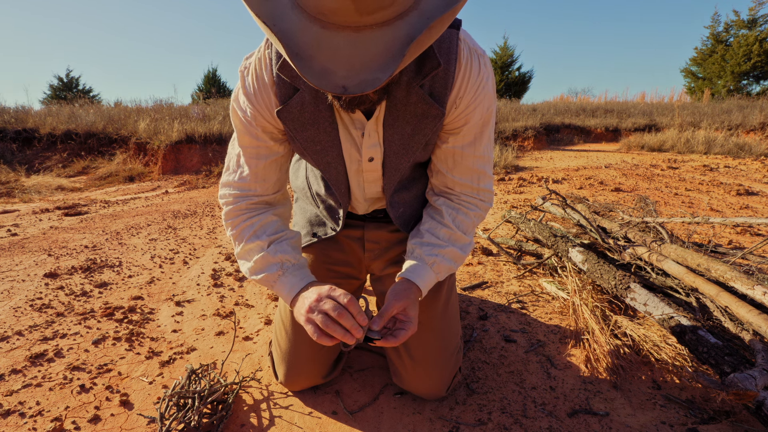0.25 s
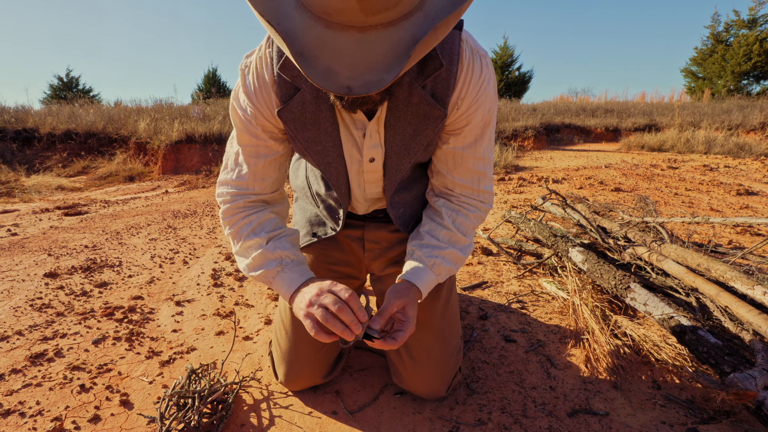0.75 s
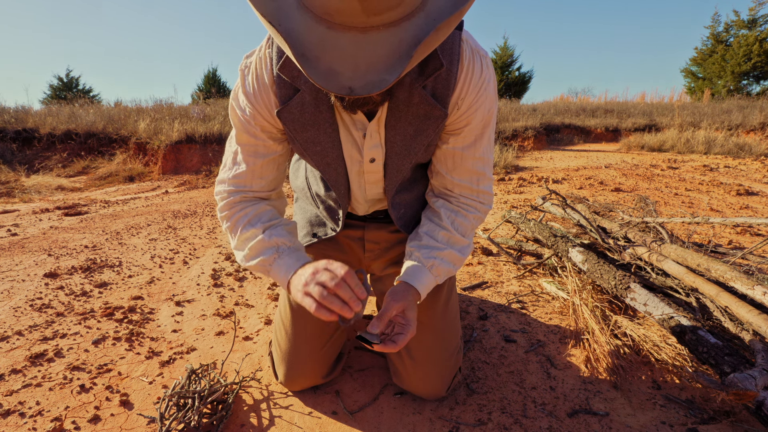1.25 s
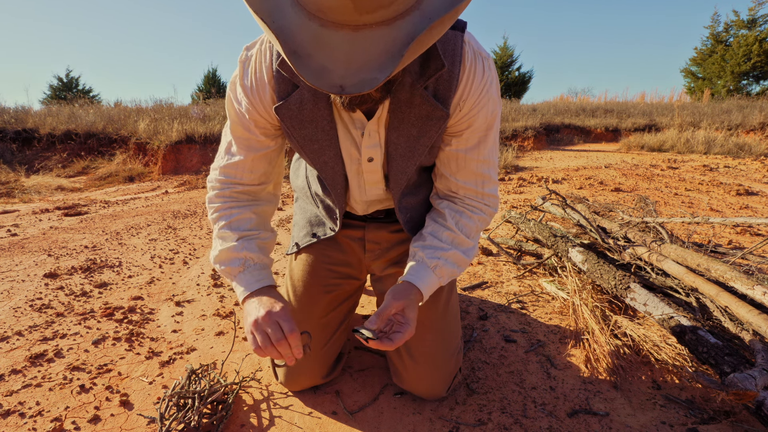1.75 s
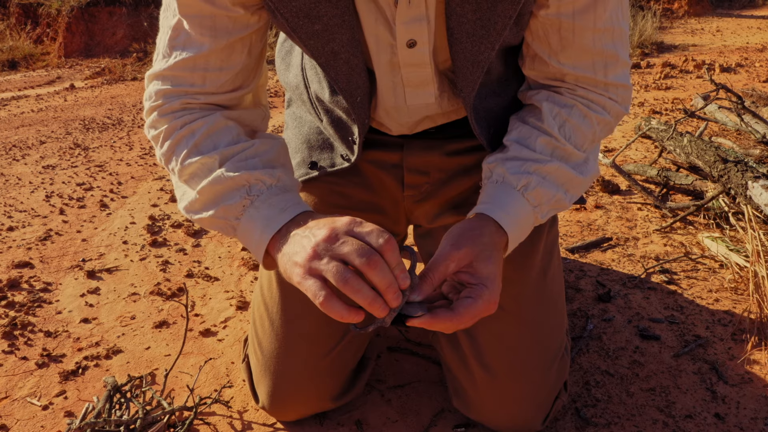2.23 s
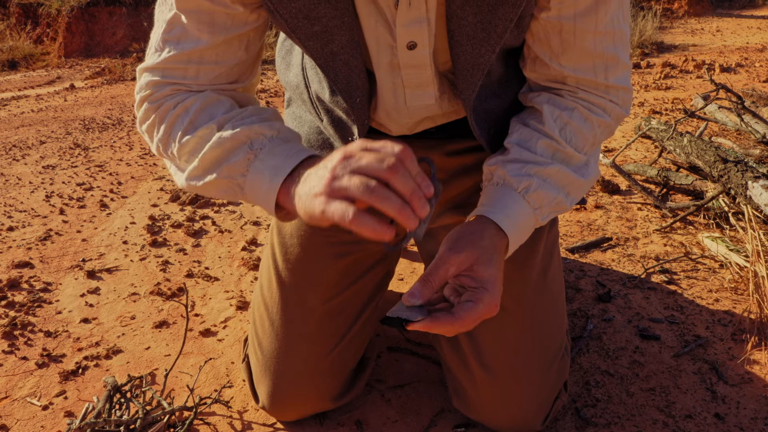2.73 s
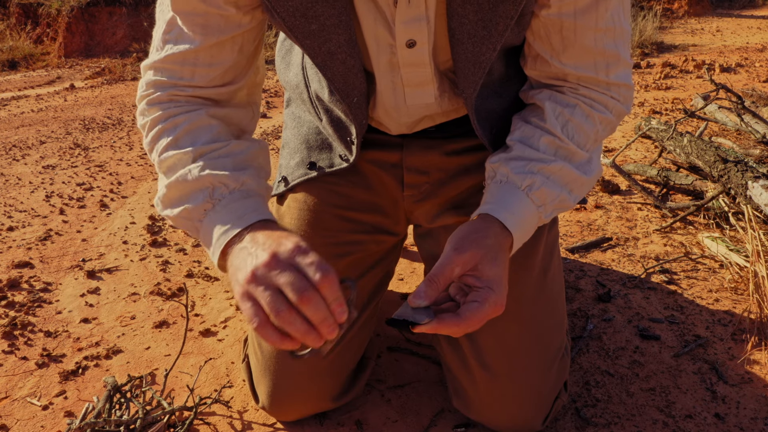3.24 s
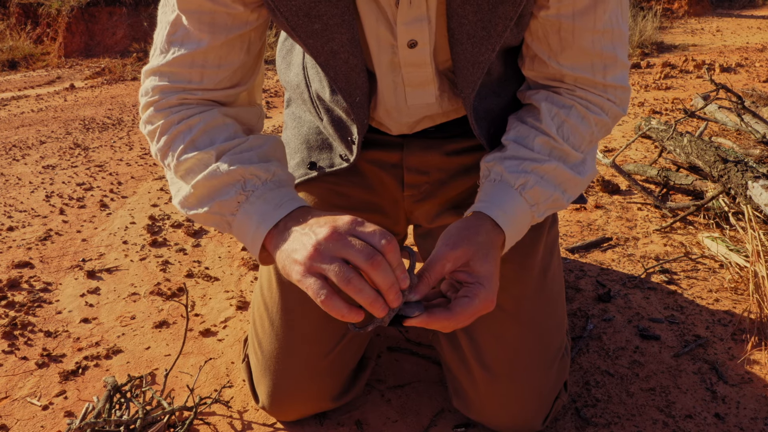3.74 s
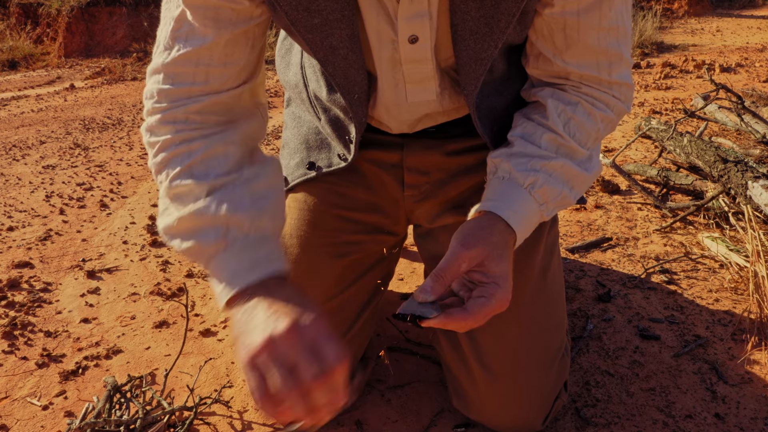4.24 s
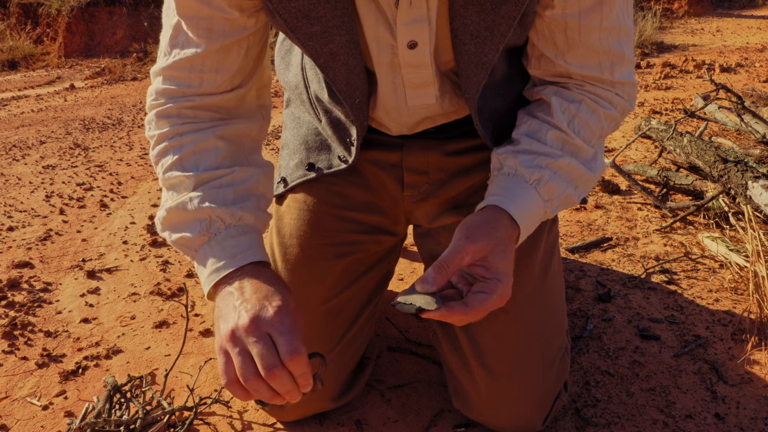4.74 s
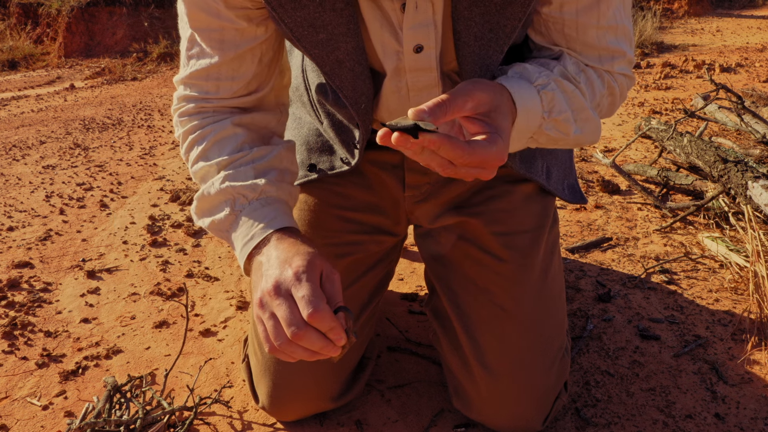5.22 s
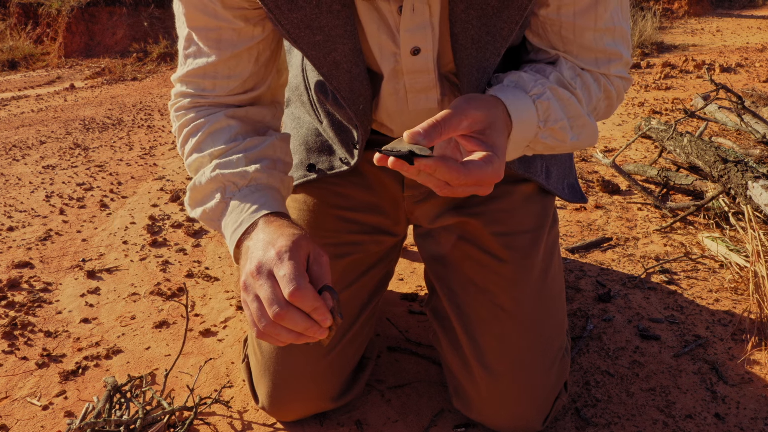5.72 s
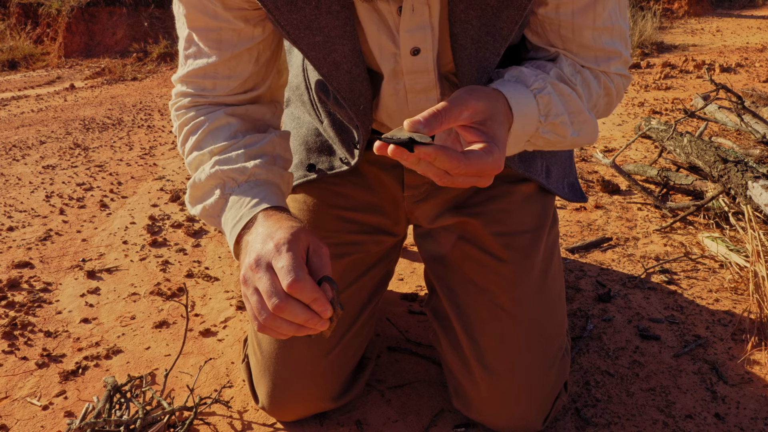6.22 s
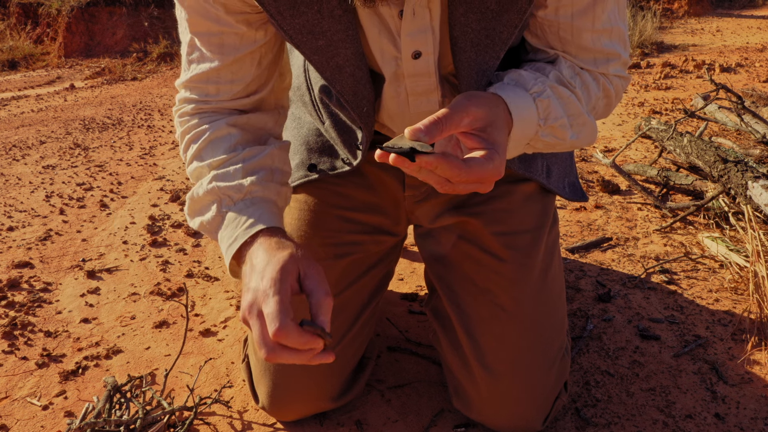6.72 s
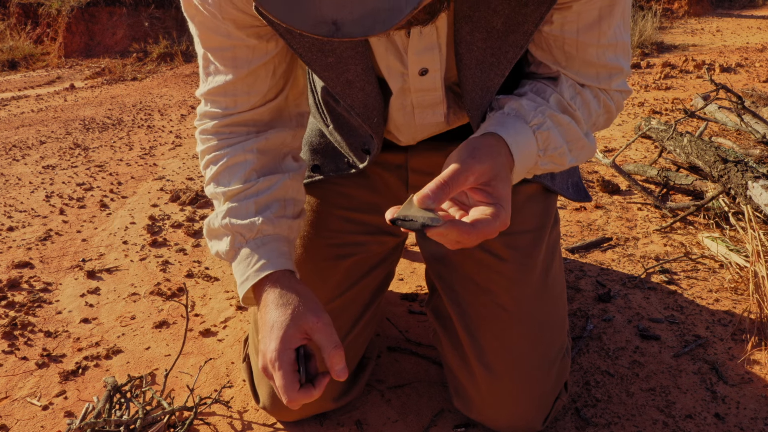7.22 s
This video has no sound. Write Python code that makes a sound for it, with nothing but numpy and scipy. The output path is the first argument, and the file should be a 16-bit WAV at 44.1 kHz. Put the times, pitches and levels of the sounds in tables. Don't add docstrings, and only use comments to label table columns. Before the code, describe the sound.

Dry open ground, heard in stereo with the hands close and central. Shrill cicadas buzz steadily on both sides, joined by raspy katydids whose bouts swell and stop abruptly, and by rapid pulsing cricket chirps, the nearer one toward the left. From 0 to 2 s low gusts thump the microphone, then the air falls nearly still. A faint tap comes near 1 s; at 1.5 s steel hits flint with a hard bright tick and a very short gritty scrape. A clear light tap follows at 2.25 s, a second blow with a stronger edge catch at 2.8 s, a softer tap at 3.56 s, and the last quick blow at 4.25 s, with a slight puff of arm-moved air. A distant engine drones softly at right, its hum changing. Insects dominate until faint cloth rustle grows from 6.3 s, ending with small dull thumps and gritty crunches around 7.35-7.43 s.

```python
import sys
import numpy as np
from scipy import signal
from scipy.fft import rfft, irfft, next_fast_len
from scipy.io import wavfile
from scipy.ndimage import uniform_filter1d

SR = 44100
rng = np.random.default_rng(int(sys.argv[2]) if len(sys.argv) > 2 else 0)


def ratio(d):
    e = np.asarray(d, float) / 20
    return 10 ** e


def persist_wave(psi):
    counts = np.round(np.clip(psi, -1, 1) * 32767).astype(np.int16)
    wavfile.write(sys.argv[1], SR, np.atleast_2d(counts).T)


N = 329427
TIME = np.arange(N) / SR
COARSE = np.arange(0, N + 40, 40) / SR


def curve(table, column=1):
    table = np.array(table)
    return np.interp(TIME, table[:, 0], table[:, column])


def unit(x):
    return x / np.sqrt(np.mean(x ** 2))


def colour(x, points):
    hz, db = np.transpose(points)
    size = next_fast_len(N, True)
    bins = np.maximum(np.fft.rfftfreq(size, 1 / SR), 1)
    gain = ratio(np.interp(np.log(bins), np.log(hz), db, right=-80))
    return unit(irfft(rfft(np.float32(x), size) * np.float32(gain), size)[..., :N])


def thin(x, hz):
    return signal.sosfilt(signal.butter(2, hz, "high", fs=SR, output="sos"), x)


def ring(push, hz, t60):
    pole = np.exp(2j * np.pi * hz / SR - np.log(1000) / (t60 * SR))
    return signal.lfilter([1], [1, -pole], push).imag


def modes(push, table, which):
    return sum(ratio(db[which]) * ring(push, hz, t60) for hz, t60, *db in table)


def walk(rate, count=N):
    k = int(SR / rate)
    steps = np.repeat(rng.standard_normal(count // k + 1), k)
    return unit(uniform_filter1d(uniform_filter1d(steps, k), k)[:count])


def grains(scatter_db, shape=(N,)):
    return unit(rng.standard_normal(shape) * ratio(scatter_db * rng.exponential(size=shape)))


def sides(left_db, right_db):
    return ratio(np.array([[left_db], [right_db]]))


def swells(table):
    gain = sum(ratio(db) * np.exp(-((COARSE - s) / width) ** 2) for s, db, width in table)
    return np.interp(TIME, COARSE, gain)


def bouts(table):
    power = 0
    for start, stop, db, swell in table:
        rise = (1 - np.exp(-np.maximum(COARSE - start, 0) / swell)) ** 4
        power = power + ratio(2 * db) * rise * (COARSE < stop)
    return np.interp(TIME, COARSE, uniform_filter1d(np.sqrt(power), size=20))


# (frequency [Hz], level [dB])
AIR_COLOUR = [(20, -10.5), (60, 0), (150, -7.5), (250, -14.5), (500, -25.5), (1200, -39), (2600, -28),
              (4000, -28.5), (5500, -20.5), (7000, -28), (11000, -27), (16000, -26)]


def air():
    mid, side = (colour(rng.standard_normal(N), AIR_COLOUR) for _ in range(2))
    return ratio(-49 + 0.48 * walk(1.9)) * (mid + 0.86 * side * np.array([[1], [-1]]))


# (time [s], pitch [Hz], level [dB])
DRONE = [(0, 61.63, -49), (2, 61.58, -47.5), (3.4, 60.83, -47), (4.2, 61, -54), (5, 61.2, -60.5)]
# (multiple, level [dB])
DRONE_ORDERS = [(1, 2.5), (2, -3.5), (3, -20), (4, -18.5)]
# (time [s], pitch [Hz], level [dB])
WHINE = [(3, 147.2, -67), (3.6, 146.9, -53.5), (4, 146, -68), (4.7, 145, -57), (5.8, 145.5, -49),
         (6.8, 145.1, -54), (7.2, 142, -72)]
# (time [s], pitch [Hz], level [dB])
HUM = [(5.5, 123, -59), (6.2, 121.3, -57), (7.1, 116.6, -52.5), (7.47, 116.2, -55)]


def engine():
    out = 0
    whine_orders = [(.5, -4.0), (1, 0.0), (1.5, -11.5)]
    for table, orders in ((DRONE, DRONE_ORDERS), (WHINE, whine_orders), (HUM, [(0.97, 0)])):
        running = 1. * (TIME > table[0][0]) * (TIME < table[-1][0])
        running = uniform_filter1d(running, size=15000)
        phase = np.cumsum(curve(table) * (1 + 0.0043 * walk(5))) * 2 * np.pi / SR
        for multiple, db in orders:
            level = ratio(curve(table, column=2) + db + 1.1 * walk(3.22))
            out = out + running * level * np.sin(multiple * phase) * np.sqrt(2)
    return out * sides(-14.0, 3.4)


# (peak [s], level [dB], width [s])
GUSTS = [(.07, -39, 0.022), (.17, -44, 0.06), (.29, -46.5, 0.064), (.62, -45, 0.066), (.43, -33, 0.054),
         (.51, -45, 0.037), (.75, -37, 0.052), (.92, -43, 0.17), (1.11, -38, 0.12), (1.35, -49, 0.15),
         (1.5, -43, 0.1), (1.62, -40.5, 0.068), (1.8, -34, 0.059), (1.95, -38.5, 0.09), (1.1, -52, 0.87)]
# (frequency [Hz], density [dB per Hz])
GUST_COLOUR = [(12, -17), (20, -1), (33, -11), (65, -6), (136, -12.5), (783, -43), (990, -46.5),
               (1500, -63), (1950, -67), (3300, -120)]
# (peak [s], level [dB], width [s])
HEAVES = [(.2, -52, 0.21), (.46, -48, 0.048), (1.1, -36, 0.25), (1.6, -48, 0.44), (2.29, -39.5, 0.13),
          (3.05, -41, 0.11), (3.45, -52.5, 0.22), (4.31, -47, 0.033), (4.85, -41, 0.2), (6.4, -65, 0.29)]
# (peak [s], level [dB], width [s])
ARM_SWING = [
    (4.5, -43, 0.048),
]


def wind():
    both, left, right = (colour(grains(3.15), GUST_COLOUR) for _ in range(3))
    calm_s = 2.01
    blowing = swells(GUSTS) * ratio(1.8 * walk(19.8)) * (TIME < calm_s)
    eddies = (blowing + swells(ARM_SWING)) * (both + .5 * np.array([left, right]))
    heave_colour = [(1, -16.0), (5, 4.5), (12, -9.5), (22, -17.0), (50, -20.5), (100, -50)]
    heave = colour(rng.standard_normal(N), heave_colour)
    return eddies + (swells(HEAVES) + ratio(-55.5)) * heave * sides(-34, 12.75)


def singer(clicks, body, throb_hz, depth, sharp, alike):
    phase = np.cumsum(throb_hz * (1 + 0.0207 * walk(1.976))) * 2 * np.pi / SR
    throb = 1 - depth + depth * np.exp(sharp * (np.cos(phase) - 1))
    both, *own = np.roll(clicks, rng.integers(N), axis=1)
    return colour(throb * (alike * both + np.array(own)), body) * np.exp(0.11 * walk(5.5))


# (time [s], cicadas [dB], broad singer on the right [dB])
SWELLING = [(0, -39.5, -56), (.8, -40, -50.5), (1.5, -38.5, -52.5), (2.4, -40.5, -48), (5.3, -39.5, -46),
            (5.84, -39.5, -46), (6.2, -40, -47), (7.47, -41, -46.5)]
# (frequency [Hz], density [dB per Hz])
CICADA_LEFT = [(6000, -32), (7000, -23), (7600, -6), (8000, -0.5), (8600, 0), (9100, -9.5), (9900, -18),
               (10400, -13), (12000, -41)]
CICADA_RIGHT = [(6000, -31), (7300, -16.5), (8050, -2), (8250, 2), (8450, 4.5), (8800, -10.5),
                (9300, -14.5), (9700, -18), (10300, -30), (12000, -21)]
BROAD = [(3000, -33.5), (3800, -8.5), (5000, -6), (6000, -1.5), (6900, 2), (7500, -2), (9000, -8),
         (11000, -27)]
BROAD_LOW = [(2500, -31), (2750, -2), (3300, -4.5), (3800, 1.5), (4400, -14.5), (5000, -30)]
TICKER = [(9000, -33), (9450, -3), (9750, 0), (10100, -25)]
RASP = [(8500, -41), (9500, -0.5), (10300, -3), (10800, -2), (10970, 6), (11150, -2), (11500, 0),
        (12100, -7), (13000, -2), (14000, -7), (14800, -4)]
KATYDID = [(11000, -25), (12900, -7), (13600, -8), (14400, -2), (15000, 2.5), (15700, -4), (17000, -8)]
SHRILL = [(11000, -17.5), (12500, -2.5), (13200, -7), (14000, -0.5), (15500, -0.5), (17000, -12)]
REED = [(4100, -41), (4450, -3), (5000, -4), (5250, 3), (5700, -17), (5870, 8.5), (6060, -10), (6350, 1),
        (6600, -30)]
FAR_CRICKETS = [(3900, -29), (4250, 3.5), (4500, -2.5), (4750, -18), (4950, -22), (5300, -35)]
# (start [s], stop [s], level [dB], swell [s])
RASP_SONG = [(-.1, .685, -48, .02), (-.1, 1.025, -48.5, .02), (-.1, 1.78, -53, .02), (1.9, 3.7, -46, .35),
             (3.5, 4.4, -54, .05), (4.1, 5.415, -45.5, .12), (5.2, 7.6, -52, .3)]
KATYDID_SONG = [(-.1, .415, -48.5, .02), (4.25, 5.415, -44.5, .12), (2.5, 7.6, -60, 1.5)]
SHRILL_SONG = [(-.5, 3.405, -50.5, .5), (3.2, 4.4, -55, .1), (4.5, 7.6, -49.5, .45)]
# (time [s], level [dB])
REED_SONG = [(0, -53), (1.4, -52.5), (2.3, -62.5), (2.8, -70), (7.47, -65)]


def insects():
    cicadas, broad = (ratio(curve(SWELLING, column=k)) for k in (1, 2))
    stutter = swells((3.653 + k * .0575, -48, .005) for k in range(6))
    clicks = grains(1.5, (3, N))
    return (cicadas * sides(2.65, -1.6) * singer(clicks, CICADA_LEFT, 30, 0.43, 1.5, 0.45)
            + cicadas * sides(-3.0, 4.6) * singer(clicks, CICADA_RIGHT, 33.3, 0.4, 0.87, 0.69)
            + broad * sides(-11, 10.02) * singer(clicks, BROAD, 11.5, 0.25, 2.1, 0.1)
            + broad * sides(-31, -4.5) * singer(clicks, BROAD_LOW, 11.5, 0.43, 1.3, 0.35)
            + sides(-55.0, -53) * singer(clicks, TICKER, 9.7, 0.95, 2.1, 0.32)
            + bouts(RASP_SONG) * sides(2.6, 4.8) * singer(clicks, RASP, 118, 0.43, 1.5, 0.18)
            + bouts(KATYDID_SONG) * sides(4.4, -6) * singer(clicks, KATYDID, 64, 0.96, 1.6, 0.33)
            + stutter * sides(0, -11) * colour(clicks[1:], RASP[3:-1] + KATYDID[3:])
            + bouts(SHRILL_SONG) * sides(4.4, 4.3) * singer(clicks, SHRILL, 100, .3, 1.5, 0.62)
            + ratio(curve(REED_SONG)) * sides(-26, 7.7) * singer(clicks, REED, 50, 0.3, 1.5, 0.42)
            + sides(-60.0, -53.5) * singer(clicks, FAR_CRICKETS, 22, 0.5, 1.8, 0.33))


def strokes(chirps, gap_s, top_hz, hook, count):
    song = []
    for s, db, climb_hz, swell_db in chirps:
        for k in range(count):
            back = max(k - 1, 0)
            level_db = db - swell_db * back ** 2.3
            song.append((s - k * gap_s, level_db, top_hz - climb_hz * back ** 0.82, hook))
    return song


# (last stroke [s], level [dB], pitch climb [Hz], swell [dB])
CHIRPS = [(.291, -40.5, 130, -0.5), (.585, -41, 130, 2), (.977, -40.5, 120, 1.5), (1.336, -41, 45, 2),
          (1.708, -41, 100, 2.5), (2.095, -41.5, 70, 2.5), (2.418, -42, 99, 2), (2.785, -42, 130, 3),
          (3.169, -42.5, 75, 3), (3.545, -41.5, 100, 3), (3.903, -39.5, 115, 2.5), (4.232, -38, 85, 3),
          (4.6, -39.5, 105, 3.5), (4.873, -43, 142, 5), (5.277, -44.5, 133, 5), (5.639, -42, 19.7, 11),
          (6.01, -43, 62, 2), (6.41, -41.5, 140, 3), (6.781, -43.5, 110, 6), (7.111, -42, 110, 7),
          (7.4, -44, 150, 5)]
# (last stroke [s], level [dB])
ANSWERS = [(.565, -46), (.76, -56), (1.386, -45.5), (1.746, -45), (1.915, -53), (2.183, -46), (2.526, -48),
           (2.85, -47), (3.175, -45), (3.428, -48), (3.695, -47.5), (4.015, -49), (4.29, -47), (4.68, -48),
           (5.0, -48), (5.47, -54), (5.741, -46), (6.201, -47), (6.675, -44.5), (7.14, -45.5), (7.45, -48)]


def crickets():
    out, u = np.zeros((2, N)), np.linspace(0, 1, num=1300)
    shape = np.sin(np.pi * u ** 1.02) ** 0.93
    answers = [(s, db, 30, 4) for s, db in ANSWERS]
    song = strokes(CHIRPS, gap_s=.046, top_hz=4733, hook=0.12, count=5)
    song += strokes(answers, gap_s=.046, top_hz=4510, hook=.03, count=3)
    for (s, db, hz, hook), lag in zip(song, rng.uniform(0, 2 * np.pi, (len(song), 1))):
        bend = 1.005 - hook * u ** 4 - .03 * (1 - u) ** 4 + .003 * walk(300, count=len(u))
        phase = np.cumsum(hz * bend) * 2 * np.pi / SR + lag
        stroke = ratio(db) * shape * np.sin(phase + np.array([[0], [.9]])) * sides(5.2, -4.0)
        part = out[:, int((s - .009) * SR):][:, :len(u)]
        part += stroke[:, :part.shape[1]]
    scrub = rng.standard_normal((2, 2000)) * np.exp(-np.arange(2000) / 700)
    return out + ratio(-35) * signal.oaconvolve(out, scrub, axes=1)[:, :N]


# (time [s], level [dB])
SLEEVE = [(6.3, -64), (6.6, -57), (6.9, -53.5), (7.2, -54), (7.33, -55.5), (7.37, -59), (7.4, -51),
          (7.44, -53), (7.47, -53)]
# (frequency [Hz], density [dB per Hz])
SLEEVE_COLOUR = [(180, -19), (300, -1), (622, -8.5), (892, -4), (1170, -8), (1540, -6.5), (3500, -17.5),
                 (4550, -35), (7700, -120)]
# (time [s], push length [s], thump [Hz], level [dB])
THUMPS = [(7.344, .0004, 430, -41), (7.353, .0004, 520, -40), (7.3845, .0005, 450, -36),
          (7.389, 0.00032, 383, -32), (7.398, 0.00021, 597, -32.5), (7.394, .0003, 760, -44),
          (7.402, .0005, 320, -40.5), (7.407, .0004, 520, -40), (7.432, .0003, 905, -41)]
# (peak [s], width [s], low ring [dB], high ring [dB])
GRIT = [(7.35, .004, -50, -54), (7.358, .005, -60, -46), (7.391, 0.0056, -46, -38), (7.399, .003, -42, -39),
        (7.405, 0.0034, -38, -44), (7.432, .015, -66, -60)]


def body():
    out = ratio(curve(SLEEVE) + .8 * walk(15)) * colour(grains(1.8), SLEEVE_COLOUR)
    end = slice(int(7.2 * SR), N)
    t = TIME[end]
    knocks = grains(2.3, t.shape)
    low = ring(knocks, 2900, 0.0049) + 0.49 * ring(knocks, 2800, 0.0033) + 0.41 * ring(knocks, 1900, 0.002)
    high = ring(knocks, 3830, 0.0074) + .6 * ring(knocks, 3300, .004) + .5 * ring(knocks, 4600, .006)
    low, high = unit(thin(low, 1400)), unit(thin(high, 2100))
    for s, length, hz, db in THUMPS:
        thump = thin(ring(np.exp(-((t - s) / length) ** 2), hz, 0.031), 220)
        out[end] += ratio(db) * thump / np.abs(thump).max()
    for s, width, low_db, high_db in GRIT:
        out[end] += np.exp(-((t - s) / width) ** 2) * (ratio(low_db) * low + ratio(high_db) * high)
    return out


# (time [s], level [dB], stone ring [Hz], knuckle knock [dB], steel ring [dB])
TAPS = [(.9665, -35.5, 2600, -20, -29), (.967, -35, 1440, -25, -30), (.9675, -31, 3430, -20, -30),
        (.9705, -34, 3450, -20, -30), (1.0, -29, 700, -13, -30), (2.251, -32, 4000, -3, -30),
        (2.2545, -36, 3400, -20, -30), (2.2562, -17, 5030, -28, -9), (2.2577, -9.5, 4100, -23, -12.5),
        (2.26, -21, 4270, -14, -18), (2.2608, -20, 3350, -27, -30), (3.5591, -23, 3000, -13, -30),
        (3.56, -32, 5100, -20, -30), (3.5604, -21.5, 3630, -10, -30), (3.5605, -21, 4270, -14, -30),
        (3.5619, -31, 2300, -5, -30), (3.563, -28, 3300, -7, -30), (3.5644, -28, 3300, -3, -30),
        (4.301, -50, 2300, 10, -30), (4.3012, -33, 900, -20, -30), (.5, -31, 700, -25, -30),
        (5.13, -41, 1280, -5, -33), (1.65, -46, 2330, -2, -30)]


def tap(tick, db, hz, knock_db, steel_db):
    t60 = min(0.0056 * ratio(-.35 * (db + 13)), .012)
    knock = ring(tick, 2340, 0.005) + 0.28 * ring(tick, 1900, 0.02)
    knock += 0.22 * ring(tick, 1480, .016) + 0.3 * ring(tick, 800, 0.011)
    stone = ring(tick, hz, t60) + ratio(-15) * ring(tick, 3400, .024) + ratio(knock_db) * knock
    steel = ratio(steel_db) * (ring(tick, 7100, 0.023) + .5 * ring(tick, 11580, 0.02))
    soft_stone = uniform_filter1d(np.roll(stone, 2), size=3)
    return ratio(db) * thin(soft_stone + steel, 1330)


# (time [s], tick [dB], drag [dB], edge catch after [s], catch [dB])
BLOWS = [
    (1.5267, 0, -18.5, 0.013, -21),
    (2.8175, 1, -18, 0.012, -14),
    (4.2506, 1, -17, 0.0096, -21),
]
# (frequency [Hz], t60 [s], level in blow 1, 2, 3 [dB])
STEEL = [(7220, 0.018, -21, -17, -16), (7490, 0.014, -15, -7.5, -6.5), (7960, 0.016, -2, 1, 1.5),
         (8740, 0.037, -14, -12.5, -10), (9480, 0.0077, -5.5, -4.5, -9), (10330, 0.0061, -10, -6, -11),
         (11380, 0.014, -8, -7, -9), (11960, 0.02, -15, -11, -14), (13700, 0.0049, -7, -20, -20),
         (14800, 0.0059, -9, -9, -21)]
STONE = [(1800, 0.014, -23, -42, -33), (2010, 0.014, -34, -25, -38), (2380, 0.014, -35, -26, -15),
         (2570, .009, -20, -8.5, -12), (3220, 0.011, -7, -28, -22), (3640, 0.013, -6, -6.5, -13),
         (4120, 0.014, -18, -14, -11), (4340, 0.011, -9, -7.5, -9.5), (4550, .012, -5.5, -26, -15),
         (4950, 0.011, -15, -20, -9.5), (5100, 0.01, -22, -8, -18), (5260, 0.011, -9.5, -21, -18),
         (5780, 0.011, -13, -8, -11.5), (6460, 0.019, -16, -11, -11)]
TICK_STONE_DB = [-4.5, -3, -1]
# (level [dB], frequency [Hz], t60 [s])
THUDS = [(-19, 1000, 0.0052), (-25.5, 1280, 0.0054), (-18, 1300, 0.0041)]
CRACK_DB = [-20, -20, -16]
# (time [s], into the stone [dB], into the steel [dB])
SNAGS = [(1.5284, -20, -10), (1.5299, -8.5, -9), (1.5324, -14, -18), (1.5332, -10, -20), (1.5338, -16, -18),
         (1.5349, -9, -18), (1.5357, -13, -18), (1.5375, -13, -16), (1.539, -9, -12), (1.540, -9, -18),
         (1.5418, -25, -19), (1.5444, -24, -33), (1.5455, -20, -32), (2.8248, -14, -22), (2.8193, -14, -9),
         (2.826, -17, -12), (2.8272, -21, -14), (2.8284, -4.5, -10), (2.8288, -10, -6), (2.830, -15, -14),
         (2.8315, -13, -19), (2.8358, -28, -27), (4.2524, -14, -10), (4.2551, -13, -14), (4.2566, -5, -11),
         (4.259, -5, -15), (4.2602, -12, -12), (4.2625, -19, -17), (4.2643, -22, -22)]


def blow(tick, t, which):
    s, tick_db, drag_db, catch_s, catch_db = BLOWS[which]
    brush_s = .0062
    drag = ratio(drag_db) / (1 + np.exp((t - catch_s) / 0.00044))
    drag += ratio(drag_db - 10) / (1 + np.exp((t - catch_s - brush_s) / 0.0003))
    catch = ratio(catch_db) * np.exp(-((t - catch_s) / 0.0025) ** 2)
    grip = ratio(-14 / (1 + np.exp((catch_s + brush_s + .0008 - t) / .0005)))
    first = ratio(tick_db) * thin(tick, 3900)
    slips = uniform_filter1d((drag + catch) * grains(2.1, t.shape) * 0.16, size=2)
    to_stone = ratio(TICK_STONE_DB[which]) * thin(tick, 2000) + slips
    to_steel = first + ratio(-2.5) * slips
    for at, stone_db, steel_db in SNAGS:
        if 0 < at - s < t[-9]:
            i = int((at - s) * SR)
            to_stone[i:][:2] += ratio(stone_db) / 2
            to_steel[i] += ratio(steel_db)
    stone = grip * modes(to_stone, STONE, which)
    steel = modes(to_steel, STEEL, which) + ratio(-30) * to_steel
    sound = thin(thin(stone + steel, 2160), 1260)
    sound = signal.sosfilt(signal.butter(4, 14300, fs=SR, output="sos"), sound)
    thud_db, thud_hz, thud_t60 = THUDS[which]
    thud = ratio(thud_db) * ring(tick + .4 * to_stone, thud_hz, thud_t60)
    crack = ratio(CRACK_DB[which]) * uniform_filter1d(np.roll(tick, 4), size=5)
    return sound + thud + crack


def flint():
    out, t = np.zeros(N), np.arange(4096) / SR
    tick = 1. * (t == 0)
    for which, (s, *_) in enumerate(BLOWS):
        out[int(s * SR):][:len(t)] += blow(tick, t, which)
    for s, *touch in TAPS:
        out[int(s * SR):][:len(t)] += tap(tick, *touch)
    return out


def scene():
    hands = flint() + body()
    ground = ratio(-24) * np.roll(uniform_filter1d(hands, size=2), 60)
    near = hands + ground * np.array([[1], [-1]])
    return near + insects() + crickets() + wind() + engine() + air()


def top_cut(x):
    return signal.sosfilt(signal.butter(12, 16970, fs=SR, output="sos"), x)


def record(dry):
    top_hz = 15760
    wet = signal.sosfilt(signal.ellip(12, .3, 60, top_hz, fs=SR, output="sos"), dry)
    hold = np.exp(-1 / (0.012 * SR))
    loudness = signal.lfilter([1 - hold], [1, -hold], np.abs(wet).max(axis=0))
    ducked = wet / (1 + 2.5 * loudness)
    rounded = .92 * np.tanh(ducked / .92)
    mix = signal.sosfilt(signal.cheby1(8, .5, top_hz, fs=SR, output="sos"), rounded)
    return top_cut(mix)


dry = scene()
out = record(dry)
persist_wave(out)
```